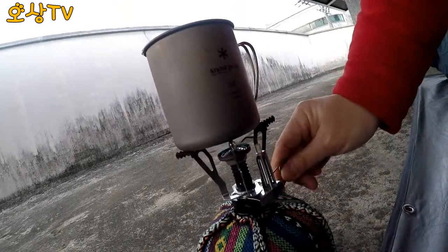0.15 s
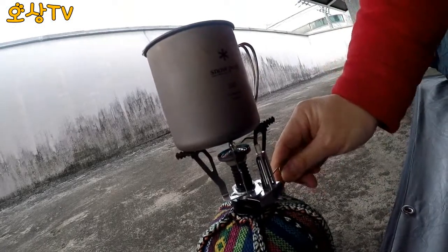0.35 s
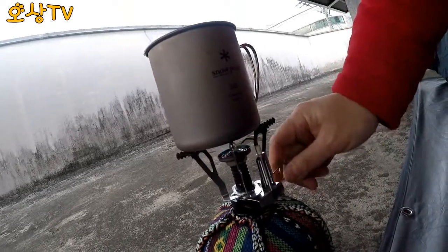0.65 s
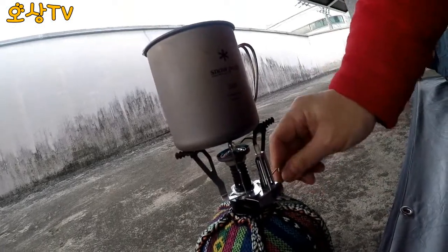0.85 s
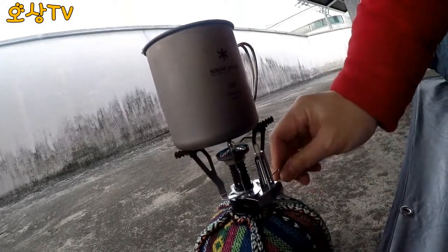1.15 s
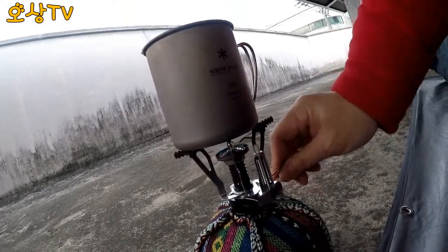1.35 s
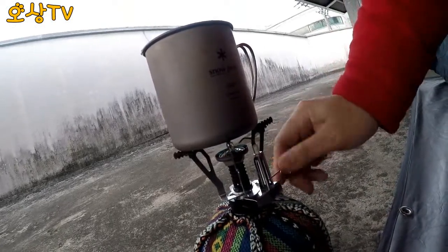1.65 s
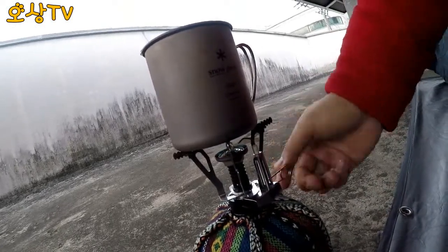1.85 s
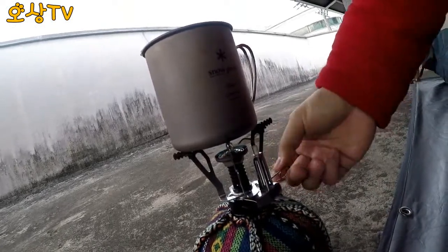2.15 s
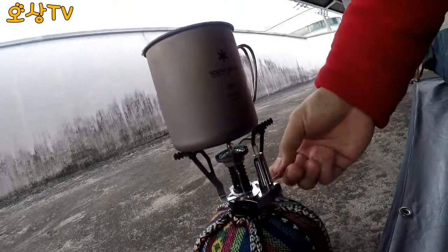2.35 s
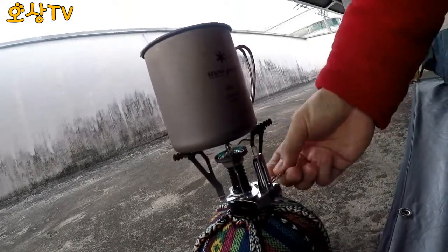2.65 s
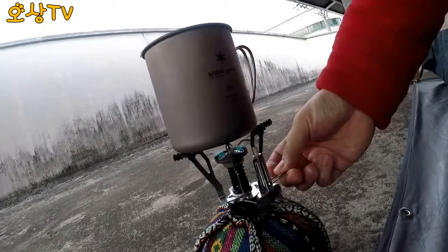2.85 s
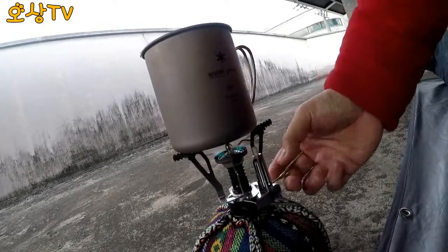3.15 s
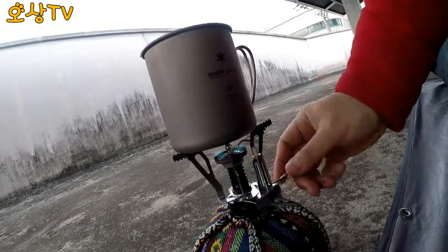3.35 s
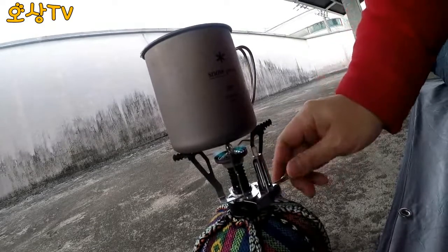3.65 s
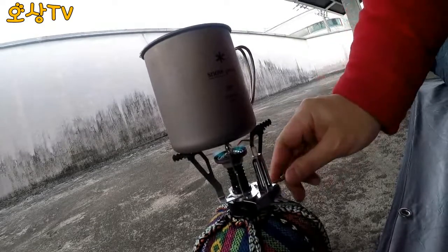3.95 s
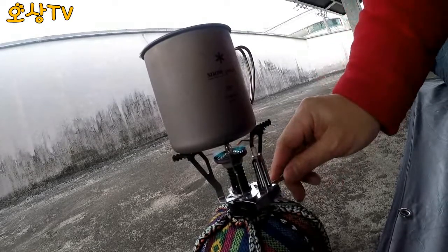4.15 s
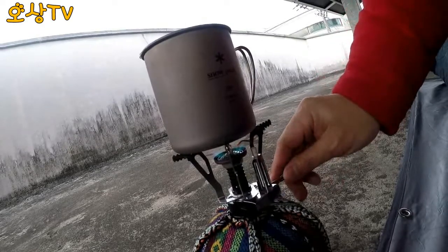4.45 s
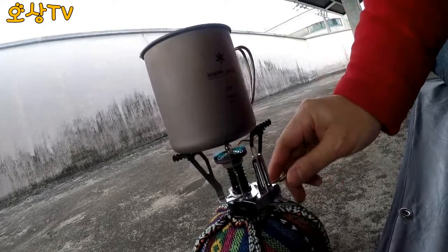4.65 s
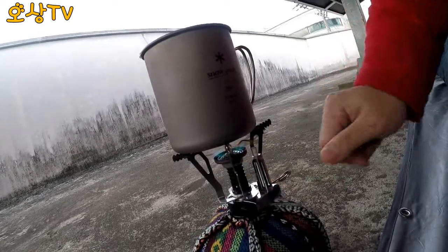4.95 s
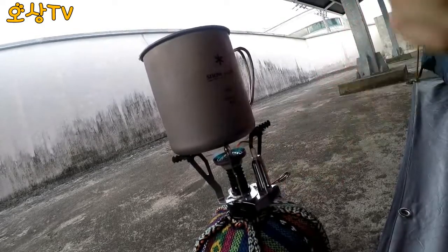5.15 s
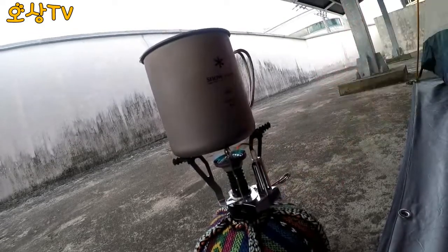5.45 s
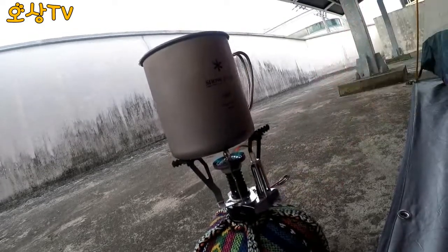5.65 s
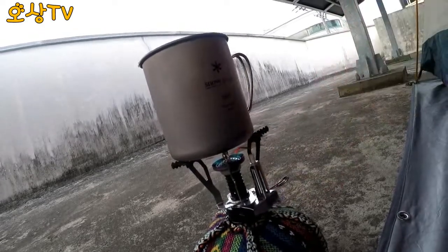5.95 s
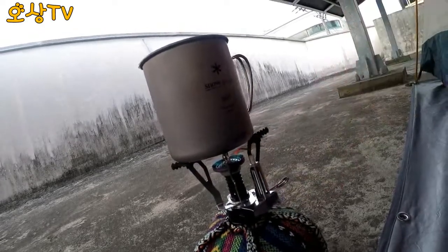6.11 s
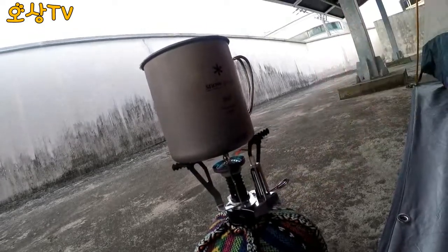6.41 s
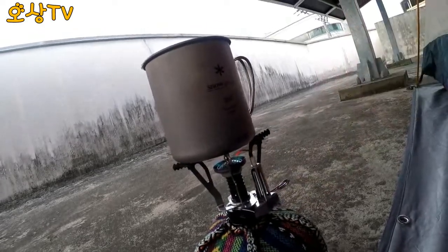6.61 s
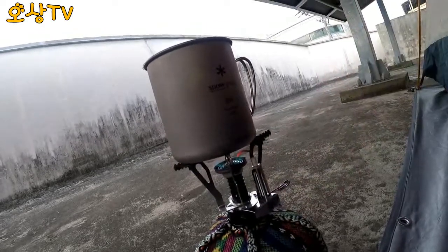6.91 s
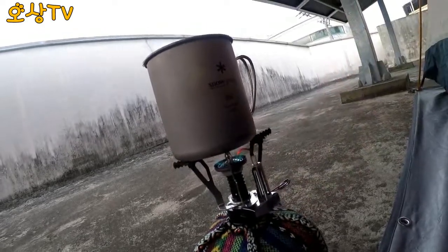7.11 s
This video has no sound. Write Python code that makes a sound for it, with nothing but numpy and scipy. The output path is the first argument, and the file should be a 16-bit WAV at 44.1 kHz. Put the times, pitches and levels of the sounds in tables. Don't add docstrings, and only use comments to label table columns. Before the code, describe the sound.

A tiny camping stove heard very close, outdoors. First only lumpy wind rumble, a soft far wash and a dull double bump; then a sudden rush of burning gas, low roar and bright hiss, shrinking over about a second. Knocks, fabric rustle, and at the end loud wind and clumsy handling thuds right on the microphone, with small taps as it fades.

```python
import sys
import numpy as np
from scipy import signal
from scipy.io import wavfile
from scipy.ndimage import uniform_filter1d

SR = 44100
rng = np.random.default_rng(int(sys.argv[2]) if len(sys.argv) > 2 else 0)


def ratio_of_db(decibels):
    return 10 ** (np.asarray(decibels, float) / 20)


def wrap_up_sound(samples):
    columns = np.atleast_2d(samples).T
    tamed = np.clip(columns, -1, 1)
    steps = np.round(tamed * 32767).astype(np.int16)
    wavfile.write(sys.argv[1], SR, steps)


N = 320915


def evened(x):
    return x / np.sqrt(np.mean(x ** 2) + 1e-20)


def read(points, hz):
    f, value = np.transpose(points)
    return np.interp(np.log(hz + 1), np.log(f + 1), value)


def curves(rows):
    s, *columns = np.transpose(rows)
    return [np.interp(np.arange(N) / SR, s, c) for c in columns]


def resonances(modes, hz):
    power = sum(ratio_of_db(2 * db) / (1 + (2 * (hz - f) / width_hz) ** 2) ** 2 for f, width_hz, db in modes)
    return 10 * np.log10(power)


def loudness_db(x, size, origin=0):
    power = uniform_filter1d((x ** 2).max(axis=0), size=size, origin=origin)
    return 10 * np.log10(abs(power) + 1e-12)


def flicker(low_hz, top_hz):
    t = np.arange(0, N + 64, 64) / SR
    hz = np.geomspace(low_hz, top_hz, num=30)[:, None]
    sines = np.sin(2 * np.pi * (hz * t + rng.random(hz.shape)))
    slow = np.sum(sines / np.sqrt(hz), axis=0)
    return np.interp(np.arange(N) / SR, t, evened(slow))


def swells(start, length, db, change_db, rise_s, fall_s):
    silent_db = 29.5
    t = np.arange(0, N + 64, 64) / SR
    start, length, db, change_db = (np.reshape(v, (-1, 1)) for v in (start, length, db, change_db))
    early = np.maximum(start - t, 0) / rise_s
    late = np.maximum(t - start - length, 0) / fall_s
    drift_db = change_db * np.clip((t - start) / length, 0, 1)
    level_db = db + drift_db - silent_db * np.minimum(early + late, 4)
    return np.interp(np.arange(N) / SR, t, np.sqrt(np.sum(ratio_of_db(2 * level_db), axis=0)))


def noise(colour, patchy_db, size=512, pair=None):
    frames, hz = 4 * N // size + 5, np.fft.rfftfreq(size, 1 / SR)
    a, b, c, d, patches = rng.standard_normal((frames, len(hz), 5)).T
    patches = uniform_filter1d(patches, size=6, axis=0)
    patches = evened(uniform_filter1d(patches, size=14, axis=1))
    left, right = a + 1j * b, c + 1j * d
    if pair:
        f, *columns = np.transpose(pair)
        same, phase, lean_db = (read(np.transpose([f, v]), hz)[:, None] for v in columns)
        same = np.clip(same, 0, 1)
        right = same * np.exp(-1j * phase) * left + np.sqrt(1 - same ** 2) * right
        left, right = left * ratio_of_db(lean_db / 2), right / ratio_of_db(lean_db / 2)
    level_db = np.reshape(colour(hz), (-1, len(hz), 1)) + patchy_db * patches
    z = np.array([left, right]) * ratio_of_db(level_db)
    both = signal.istft(z, nperseg=size, noverlap=3 * size // 4)[1][:, :N]
    return both / np.sqrt(np.mean(both[0] ** 2))


def ports(colour, side, patchy_db, size=512):
    ports_db = [
        [0.53],
        [1.23],
    ]
    mid, apart = noise(lambda hz: [colour(hz), colour(hz) + read(side, hz)], patchy_db, size=size)
    return np.array([mid + apart, mid - apart]) * ratio_of_db(np.array(ports_db))


def far():
    # (time [s], wash level [dB], its treble [dB])
    far_levels = [(0, -34, 4.5), (1, -35, 4), (2.6, -34.5, 3.5), (4.4, -34, 2.5), (5.1, -34, 1.5),
                  (6.1, -31.5, -1), (6.4, -35.5, 2.5), (6.8, -37, 0.5), (7.28, -45.5, 7.5)]
    # (frequency [Hz], density [dB per Hz])
    wash_colour = [(53, -16.5), (110, 3), (140, -2.5), (215, -3), (250, -10.5), (370, -17.5), (590, -24),
                   (1320, -32.5), (2500, -40.5), (4700, -49.5), (6800, -47), (10300, -53), (12500, -61),
                   (14800, -68)]
    # (frequency [Hz], side minus mid [dB])
    wash_side = [(60, 18), (120, -29), (240, -12.5), (470, -4.5), (930, 2.5), (1840, 0), (3650, -6.5),
                 (7230, 1.5), (14300, -0.5)]
    # (frequency [Hz], width [Hz], level [dB])
    hum_lines = [(207.3, 10.04, -45.5), (1366, 3.4, -63)]
    level_db, treble_db = curves(far_levels)
    wash = ports(lambda hz: read(wash_colour, hz), wash_side, 1.75, size=2048)
    bass = signal.lfilter(*signal.butter(1, 1800, fs=SR), wash)
    t, hum = np.arange(N) / SR, 0
    for hz, width_hz, db in hum_lines:
        gain = ratio_of_db(db + 26 + 2.8 * flicker(0.29, 2.9))
        wander = np.cumsum(0.325 * width_hz * flicker(.3, 8)) / SR
        hum = hum + gain * np.sqrt(2) * np.sin(2 * np.pi * (hz * t + wander))
    hum = hum * ratio_of_db(1.15 * treble_db + np.array([[-1.6], [1.2]]))
    return ratio_of_db(level_db) * (bass + ratio_of_db(treble_db) * (wash - bass) + hum)


def wind():
    # (time [s], left level [dB], right level [dB], weight of slowest eddies [dB])
    breeze = [(0, -20.5, -14, 2.5), (.25, -22.5, -21, -20), (.65, -24, -16, -3.5), (.8, -28.5, -22.5, -4.5),
              (1.45, -32.5, -26, -4.5), (2.2, -26.5, -24, -12), (3.2, -29, -26.5, 3), (4.5, -26.5, -25, -7),
              (5.2, -28.5, -24, -17), (6.08, -28, -21, -6.5), (6.15, -10.5, -12, -2.5),
              (6.55, -12, -12.5, 9), (6.85, -14, -26, -1), (7.28, -13, -16.5, 7.5)]
    # (time [s], left lift [dB], right lift [dB])
    gusts = [(.12, -1, 0.5), (.45, 2, 7), (0.981, 1, 7), (1.27, 10, 11), (1.59, 6, 8), (1.72, 0, 0.5),
             (1.98, 2, 5.5), (2.11, 2, 2.5), (2.38, 7, 7), (2.67, 7.5, 7), (2.92, -1, 7), (3.13, 1, 6),
             (3.33, 7, 8.5), (3.57, 2, 1.5), (3.73, 4, 7), (3.9, -4, 4), (4.03, -6, 5.5), (4.24, 0, 5),
             (4.75, 2, 0.5), (5.07, -5, 5), (5.3, 17, 7), (5.58, 12, 7), (5.84, 3, 5.5), (6.2, 1, 7.5),
             (6.48, 2.5, 3.5), (6.72, 5, 6.5), (7.03, 5, 7.5)]
    gust_half_width_s = 0.07
    # (frequency [Hz], density [dB per Hz])
    eddy_colour = [(8, -9), (20, 4), (56, 3.5), (85, -5.5), (115, -14.5), (170, -29), (300, -41),
                   (600, -71), (1500, -83), (4000, -140)]
    # (frequency [Hz], density [dB per Hz])
    heave_colour = [(4, 27), (12, 9), (25, 14), (40, 3.5), (80, -31), (200, -140)]
    *breeze_db, heave_db = curves(breeze)
    t, (s, *lift_db) = np.arange(0, N + 256, 256) / SR, np.transpose(gusts)
    lifts = np.array(lift_db) @ np.exp(-((t - s[:, None]) / gust_half_width_s) ** 2)
    gust_db = breeze_db + np.array([np.interp(np.arange(N) / SR, t, lift) for lift in lifts])
    heave = ratio_of_db(heave_db)
    eddies = noise(lambda hz: read(eddy_colour, hz), 1.0, size=8192)
    edge = signal.lfilter(*signal.butter(2, 130, "high", fs=SR), eddies) * ratio_of_db(1.05 * (gust_db + 15.5))
    slow = noise(lambda hz: read(heave_colour, hz), 0.91, size=8192)
    eddies = (eddies + heave * slow) / np.sqrt(1 + heave ** 2)
    smooth = np.sqrt(uniform_filter1d(eddies ** 2, size=6000, axis=1))
    left, right = ratio_of_db(gust_db) * (eddies / smooth ** 1.42 + edge)
    return np.array([left - 0.051 * right, right - 0.01 * left])


def cloth():
    # (time [s], swish level [dB])
    sleeve_levels = [(5.345, -70), (5.365, -40.5), (5.39, -39.5), (5.44, -46), (5.5, -43), (5.56, -35.5),
                     (5.585, -34.5), (5.7, -38.5), (5.92, -40.5), (6.1, -53)]
    # (start [s], length [s], air swish [dB], change over stroke [dB], housing rasp [dB])
    strokes = [(0.096, 0.32, -68, 9, -90), (.45, 0.21, -57.5, -6, -90), (4.995, 0.18, -56, -14, -90),
               (5.198, 0.15, -56.5, -14, -90), (6.127, 0.085, -28.5, -19.5, -29),
               (6.235, 0.038, -37.5, -12, -32.5), (6.315, 0.059, -46, -6, -30), (6.45, 0.069, -71, 15, -52),
               (6.627, 0.027, -61, -5, -56), (6.66, 0.097, -69, -2, -62), (6.769, 0.099, -58.5, -16, -59),
               (7.2, .04, -68, -2, -68)]
    stroke_rise_s, stroke_fall_s, rasp_follows = 0.024, 0.053, 0.29
    stroke_body = 0.65
    # (start [s], length [s], level [dB])
    scrapes = [(0.083, 0.062, -38), (.35, 0.25, -40.5), (5.02, .03, -40), (5.085, 0.04, -36),
               (5.2, 0.094, -35.5), (5.33, .08, -42), (5.5, .22, -43.5), (5.78, .05, -41),
               (5.88, 0.042, -37), (5.96, .06, -39), (6.143, 0.067, -20.5), (6.244, 0.031, -20.5),
               (6.296, 0.094, -24.5), (6.4, .1, -35), (6.51, 0.033, -22.5), (6.623, 0.017, -27.5),
               (6.67, 0.12, -39.5), (6.782, 0.028, -34), (6.847, .08, -44), (7.051, 0.036, -33.5),
               (7.196, 0.043, -50)]
    scrape_rise_s, scrape_fall_s = 0.041, 0.064
    # (frequency [Hz], density [dB per Hz])
    swish_colour = [(290, -33), (500, -9), (568, -19), (627, -5.5), (1070, -2.5), (1470, -7.5), (1870, -4),
                    (2500, -7), (3600, -7), (5000, -8), (6100, 0.5), (7380, -1), (8510, -10.5),
                    (10000, -14.5), (12000, -23), (13200, -24), (14000, -34), (14800, -52)]
    # (frequency [Hz], left-right likeness [0-1], phase [rad], left minus right [dB])
    swish_pair = [(300, .5, 5, -5), (1000, 0.36, 4, -5.5), (1500, 0.44, 0.5, -2.5), (2200, 0.39, 1.2, -5),
                  (2900, 0.64, 0.2, -6.5), (3700, 0.61, -0.3, -4.5), (4600, 0.88, -1.5, 0),
                  (5500, 0.77, -.7, -5), (7100, .7, -.9, 0), (8000, .6, -1.3, -2), (9800, 0.32, 1, 0),
                  (10800, .6, -3, 3), (12000, .8, -2.5, 1), (14000, .8, -2.5, 3)]
    # (frequency [Hz], density [dB per Hz])
    dull_colour = [(60, -32), (130, 6.5), (210, -3), (300, 2), (380, 3.5), (450, 2), (540, -1), (880, -11),
                   (1300, -10), (2000, -40), (6000, -120)]
    # (frequency [Hz], density [dB per Hz])
    bright_colour = [(200, -23.5), (500, -3), (1150, 2), (1700, 0.5), (2300, 1), (2900, -7), (4100, -17),
                     (6200, -36), (8600, -14), (11000, -31), (14500, -74)]
    catch = flicker(9.7, 200)
    swish = noise(lambda hz: read(swish_colour, hz), 1.0, pair=swish_pair) * ratio_of_db(-0.2 + 0.99 * catch)
    dull, bright = (noise(lambda hz: read(colour, hz), 1.2, size=1024) for colour in (dull_colour, bright_colour))
    start, length, air_db, change_db, rasp_db = np.transpose(strokes)
    sleeve = ratio_of_db(curves(sleeve_levels + [(sleeve_levels[-1][0] + .03, -99)])[0])
    sleeve = sleeve * (np.arange(N) / SR > sleeve_levels[0][0])
    close = swells(start, length, air_db, change_db, stroke_rise_s, stroke_fall_s)
    body = signal.lfilter(*signal.butter(1, [2400, 4600], "band", fs=SR), swish)
    air = swish * np.hypot(sleeve, close) + stroke_body * body * close
    rasp = swells(start, length, rasp_db, rasp_follows * change_db, stroke_rise_s, stroke_fall_s)
    scrape = swells(*np.transpose(scrapes), 0, scrape_rise_s, scrape_fall_s)
    rock, loose = bright * rasp * ratio_of_db(0.46 * catch) + dull * scrape * ratio_of_db(-3.5 + 1.5 * catch)
    return air + np.array([rock + 0.35 * loose, 0.37 * loose - 0.96 * rock])


def knocks():
    # (time [s], peak [dB], left minus right [dB], hardness [dB], shell ring [dB])
    hits = [(.926, -6.5, -5, -16, 5), (.9792, 0, -1.5, -14.5, -2.5), (.9865, -5, -3.5, -24, 3),
            (5.058, -6, 3, -10, -13), (5.0712, -1.5, -4.5, -6.5, -6), (5.539, -8, -2.5, -17, -17),
            (5.554, -7, -3, -18, -7), (5.831, -12.5, -14, -17, -14.5), (5.943, -6.5, -14, -31, -0.5),
            (6.115, -9.5, 0.5, -3, -20), (6.178, -9.5, -4.5, -22, 6), (6.207, -1, -9, -5.5, 8),
            (6.312, -10.5, 2, -21, -10), (6.537, 1, -3, -2.5, 13.5), (6.753, -12.5, -2, -28, 11),
            (7.095, -8.5, 13, -19, 7), (7.188, -16, 13, -19, -4)]
    # (time [s], peak [dB], left minus right [dB], hardness [dB])
    taps = [(0.066, -19.5, -2, -18), (0.71, -20, -1.5, -14), (5.203, -14.5, 4, -26), (5.237, -12, -3, -18),
            (6.741, -16, -3, -26), (6.783, -18, 4, -26), (6.792, -34, 4, -16), (6.868, -32, 14, -2.5),
            (6.927, -17, -16, -10), (6.993, -19, 4, -24), (7.006, -20, 0.5, -11), (7.045, -11.5, -6, -11),
            (7.213, -37, 8, -2)]
    tap_ring_db = -13
    # (frequency [Hz], t60 [s], level [dB], left-right phase [rad], left minus right [dB],
    # share of hardness [dB/dB], share of shell ring [dB/dB])
    housing = [(89.2, 0.12, 0.5, 1.9, -4.5, 0.01, 0.0088), (181.4, 0.081, 3, 4.05, 2, 0.0086, 0.0082),
               (264, 0.052, -2, 3.86, 7, 0.015, 0.21), (405, 0.045, 3.5, 3.2, -4, 0.03, 0.69),
               (550, 0.022, -4, 3.53, -1, 0.18, 0.11), (828, 0.02, 7.5, 2.9, 5.5, 1.02, 0.39),
               (1194, 0.014, 5.5, 2.42, 5.5, 1.28, 0.26), (1790, 0.018, 2, 2.06, 5.5, 1.53, 0.43),
               (2460, 0.011, 1, 2.4, 9, 2.5, 0.1)]
    # (time [s], factor on ring time [1])
    grip = [(0, 0.45), (1, 0.61), (5, 0.63), (6.1, 0.63), (6.8, 0.87), (6.92, 0.43), (7.28, 0.26)]
    t, out = np.arange(6000) / SR, np.zeros((2, N + 6000))
    blows = sorted(hits + [(*tap, tap_ring_db) for tap in taps])
    hz, t60, mode_db, phase, lean_db, hard, shell = np.transpose(housing)[:, :, None]
    chance = rng.standard_normal((len(blows), len(housing), 1))
    rise = (1 - np.exp(-t * hz * 2.36)) ** 2
    for (s, db, pan_db, hard_db, ring_db), detune in zip(blows, chance):
        decay_db = 60 * t / (t60 * np.interp(s, *np.transpose(grip)))
        size_db = mode_db + hard * hard_db + shell * ring_db - decay_db
        turn = 2 * np.pi * hz * (1 + 0.06 * detune) * t
        ring = np.array([np.sum(rise * ratio_of_db(size_db + k * (lean_db + pan_db)) * np.sin(turn + k * phase), axis=0)
                         for k in (.5, -.5)])
        contact = np.hanning(5.5 + int(np.clip(-1.4 * hard_db, 0, 120)))
        ring = signal.lfilter(contact, 1, ring)
        at = round(s * SR) - len(contact) // 2
        out[:, at:at + len(t)] += ratio_of_db(db) * ring / abs(ring).max()
    return out[:, :N]


def jolts():
    # (time [s], signed peak [1], centre [Hz], left minus right [dB])
    pushes = [(.9262, 0.27, 597, -2), (.9786, -.2, 900, -1), (5.0588, .55, 650, 1),
              (5.0722, -.35, 1000, 0.5), (5.5405, -0.14, 700, 0), (5.5555, -0.22, 600, -1),
              (5.949, 0.33, 350, -1), (6.157, -0.25, 1500, 2), (6.1802, .4, 450, -4.5),
              (6.2078, -0.23, 800, 1), (6.538, -0.61, 1000, -0.5), (6.782, -0.029, 1100, 0),
              (6.793, -0.019, 800, 0), (6.868, -.04, 1400, 4), (6.929, 0.031, 700, 3.5),
              (6.997, -0.13, 300, 4.5), (7.046, -0.047, 890, 3), (7.097, 0.16, 400, 3.5),
              (7.19, 0.2, 350, 2.5)]
    t, out = np.arange(-300, 300) / SR, np.zeros((2, N))
    for s, peak, hz, pan_db in pushes:
        u, at = (np.pi * hz * t) ** 2, round(s * SR) - 300
        push = peak * (1 - 2 * u) * np.exp(-u)
        out[:, at:at + len(t)] += push * np.array([[ratio_of_db(pan_db / 2)], [-ratio_of_db(-pan_db / 2)]])
    return out


def snaps():
    # (time [s], peak [dB], tilt [dB per octave], left minus right [dB], top [Hz])
    cracks = [(0.33, -34, -1, 0, 8000), (0.9774, -30, 2, 0, 4300), (5.0704, -20.5, 4, -8, 9000),
              (6.115, -25, 2, 0, 9000), (6.2065, -26, -6, -2, 3000), (6.5366, -22.5, -2, -2, 9000)]
    # (frequency [Hz], t60 [s], level [dB], left-right phase [rad], left minus right [dB])
    casing = [(1300, .008, -2, 2.5, 2), (1900, .008, 1, 2, 0), (2570, 0.0087, 2, 1.8, 2),
              (3120, .005, -7, 2.3, 6), (4050, 0.0058, -2, .6, 0), (4800, .005, -7, 1.8, -5),
              (5540, .008, -1, 2, -4), (6200, .006, -3, 3.4, -5), (6900, .006, -5, 2.4, -4),
              (7500, .007, -3, 4.7, -7), (8600, .005, -13, 3.1, 2)]
    t, out = np.arange(900) / SR, np.zeros((2, N))
    hz, t60, mode_db, phase, lean_db = np.transpose(casing)[:, :, None]
    grit = rng.standard_normal((len(cracks), 500))
    chance = rng.standard_normal((len(cracks), 2, len(casing), 1))
    contact = ratio_of_db(-60 * t[:500] / 0.013) * np.minimum(t[:500] / 0.00058, 1)
    for (s, db, tilt_db, pan_db, top_hz), rough, (detune, vary) in zip(cracks, grit, chance):
        size_db = mode_db + tilt_db * np.log2(hz / 4000) + 1.2 * vary - 60 * t / t60
        turn = 2 * np.pi * hz * (1 + 0.019 * detune) * t
        ring = np.array([np.sum(ratio_of_db(size_db + k * (lean_db + pan_db)) * np.sin(turn + k * phase), axis=0)
                         for k in (.5, -.5)])
        crack = signal.lfilter(rough * contact, 1, ring)
        crack = signal.lfilter(*signal.butter(6, min(top_hz, 20000), fs=SR), crack)
        at = round(s * SR)
        out[:, at:at + len(t)] += ratio_of_db(db) * crack / abs(crack).max()
    return out


def flame():
    # (time [s], steady flame size [dB])
    valve = [(2.72, -30), (2.8, -15), (2.825, -5.5), (2.89, -1), (3.28, -3), (3.4, -5.5), (4.2, -18),
             (4.4, -16), (4.95, -18.5), (5.1, -24.5), (6.1, -23), (6.42, -27), (6.9, -33), (7.28, -45)]
    # (start [s], length [s], flame size [dB])
    flares = [(2.912, .02, -3), (3.08, 0.017, -4), (3.165, 0.025, -4.5), (3.246, .04, -3.5),
              (3.403, 0.067, -5.5), (3.646, 0.018, -5), (3.723, 0.023, -2.5), (3.82, 0.12, -9.5),
              (4.001, 0.097, -2.5), (4.135, 0.021, -2.5), (4.263, 0.022, -4), (4.549, 0.028, -7),
              (6.488, 0.03, -12), (6.62, 0.017, -17), (6.777, 0.041, -14.5), (7.192, 0.022, -22.5)]
    flare_rise_s, flare_fall_s = 0.045, 0.15
    # (frequency [Hz], density [dB per Hz])
    roar_colour = [(29, -45), (50, -11.5), (75, -4), (161, 0), (198, -0.5), (417, -10), (811, -26),
                   (1260, -33), (2200, -50), (2860, -68), (4840, -120)]
    # (frequency [Hz], density [dB per Hz])
    jet_colour = [(4800, -19), (5500, -17), (5750, -6), (6400, -1.5), (7000, -4), (7700, -8.5), (8000, -23),
                  (9200, -19.5), (11000, -36), (11900, -23), (12800, -34), (14500, -60)]
    # (frequency [Hz], width [Hz], level [dB])
    mug_modes = [(1280, 590, 8), (1870, 790, -2), (3200, 1100, 2), (4150, 970, -3), (5020, 900, -10)]
    # (frequency [Hz], left-right likeness [0-1], phase [rad], left minus right [dB])
    flame_pair = [(60, 1, -1.5, -1.5), (196, 1, -0.5, -3), (494, 0.85, 0.4, -4), (950, 0.65, 0.2, 0.5),
                  (1500, 0.57, 0.5, 0.5), (2200, 0.4, 0, 5.5), (2900, 0.98, -0.5, -2), (3800, 1, -2, -0.5),
                  (4700, 1, -2, -1), (5500, .55, 1.5, -3), (6300, .15, -1, -7), (7100, .3, 1.7, -1),
                  (8000, .15, 2.3, -2), (9500, .1, -2, -4), (11900, .8, 0, 0), (14000, .3, 0, -1)]
    roar_db, jet_db, rush_db = -26.5, -46.5, -44
    roar_follows, jet_follows, rush_follows = 0.59, 0.96, 0.81
    jet_gains = 0.24
    valve_db = curves(valve)[0]
    fanned = swells(*np.transpose(flares), 0, flare_rise_s, flare_fall_s)
    size_db = 20 * np.log10(np.hypot(ratio_of_db(valve_db), fanned))
    flutter = flicker(11, 70)
    lit = np.interp(np.arange(N) / SR, [2.6, 2.7], [0, 1])
    roar = noise(lambda hz: read(roar_colour, hz), 1.35, size=2048, pair=flame_pair)
    roar = roar * ratio_of_db(roar_db + roar_follows * size_db + 1.0 * flutter)
    jet = noise(lambda hz: read(jet_colour, hz), 2.0, pair=flame_pair)
    drive_db = jet_gains * np.maximum(valve_db, -12)
    jet = jet * ratio_of_db(jet_db + jet_follows * size_db + drive_db + 0.34 * flutter)
    rush = noise(lambda hz: resonances(mug_modes, hz), 1.5, pair=flame_pair)
    rush = rush * ratio_of_db(rush_db + rush_follows * size_db + 0.57 * flutter)
    return lit * (roar + jet + rush)


def scene():
    duck_from_db, duck_share, duck_back_db_per_s = -17.5, 0.38, 350
    blows = knocks() + jolts() + snaps()
    breeze = wind()
    airy = far() + flame() + cloth()
    blow_db = loudness_db(blows, 200, origin=99)
    back_db = np.arange(N) * duck_back_db_per_s / SR
    held_db = np.maximum.accumulate(blow_db + back_db) - back_db
    over_db = np.maximum(held_db - duck_from_db, 0)
    return breeze + blows + airy / ratio_of_db(duck_share * uniform_filter1d(over_db, size=200, origin=99))


def band_limit(x):
    return signal.sosfilt(signal.butter(12, 14930, fs=SR, output="sos"), x)


def record(dry):
    limit_db, limit_share = -8, .85
    edges = signal.windows.tukey(N, .0012)
    over_db = np.maximum(loudness_db(dry, 900) - limit_db, 0)
    limited = dry / ratio_of_db(limit_share * uniform_filter1d(over_db, size=900))
    return band_limit(np.clip(limited * edges, -1, 1))


dry = scene()
out = record(dry)
wrap_up_sound(out)
```